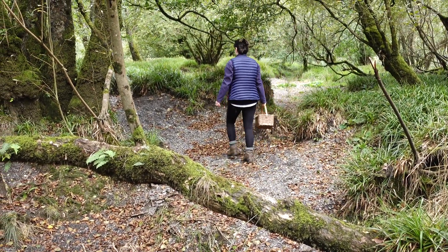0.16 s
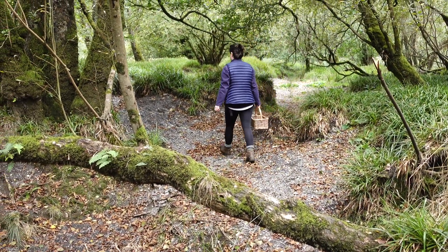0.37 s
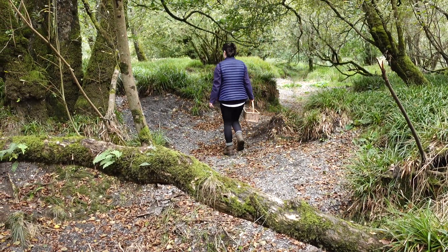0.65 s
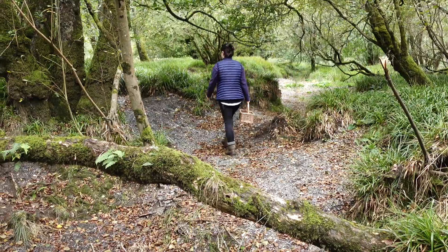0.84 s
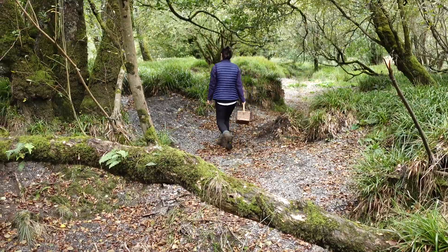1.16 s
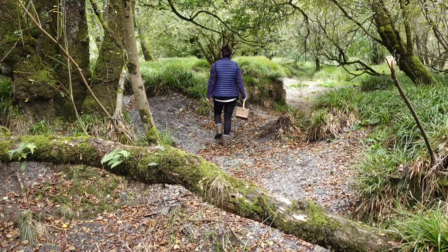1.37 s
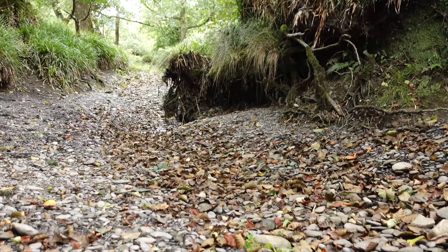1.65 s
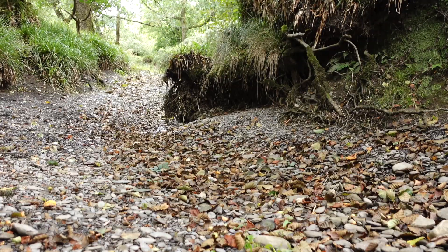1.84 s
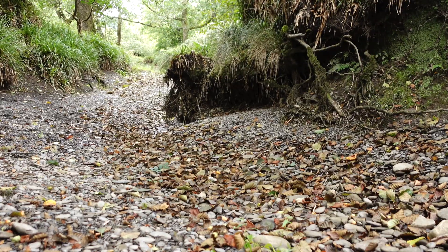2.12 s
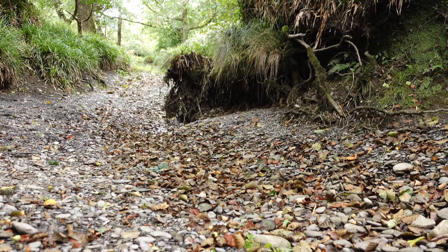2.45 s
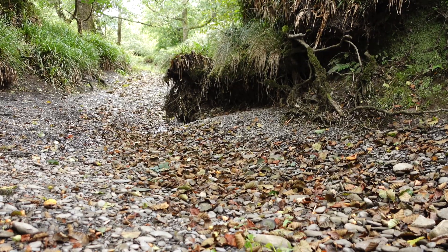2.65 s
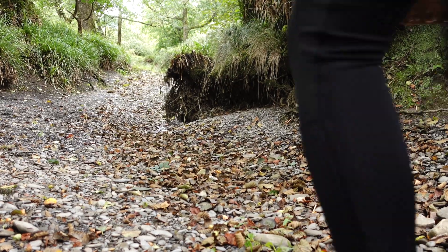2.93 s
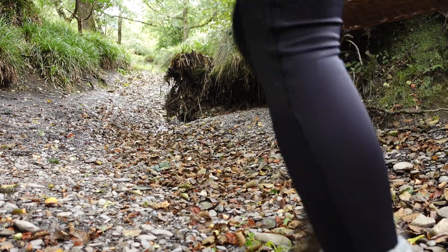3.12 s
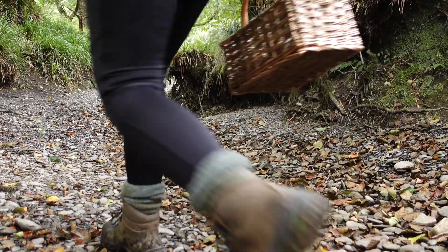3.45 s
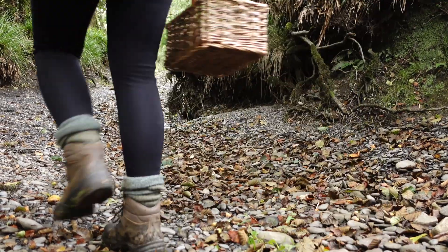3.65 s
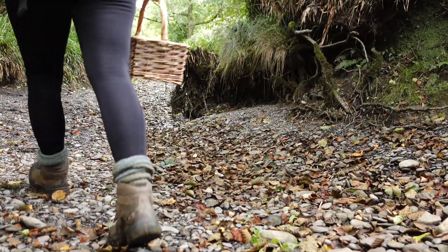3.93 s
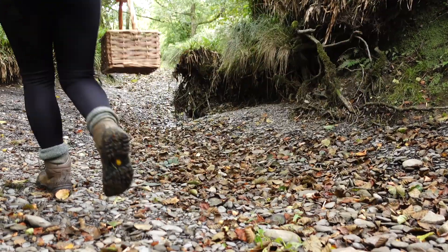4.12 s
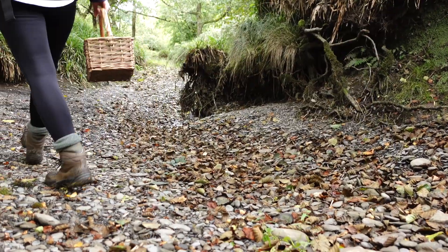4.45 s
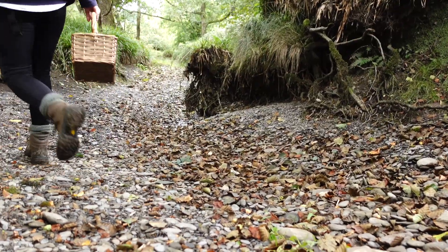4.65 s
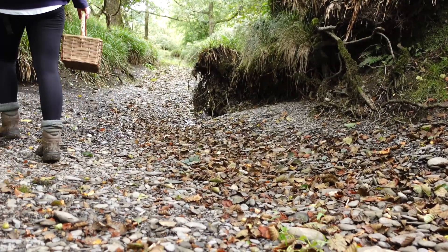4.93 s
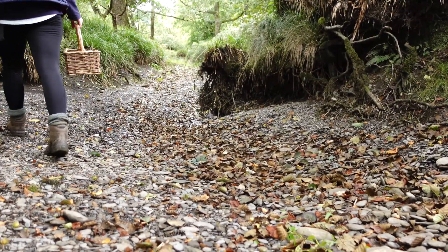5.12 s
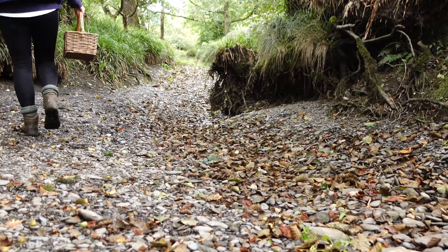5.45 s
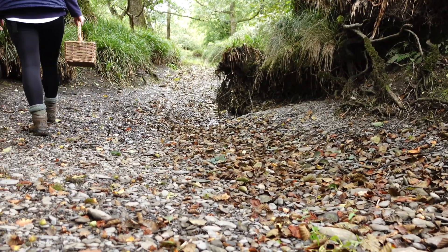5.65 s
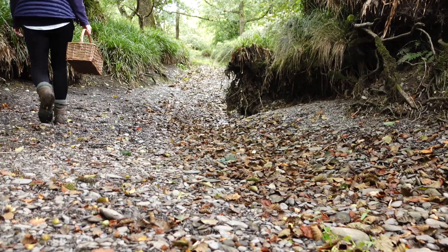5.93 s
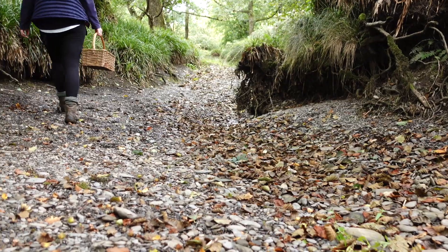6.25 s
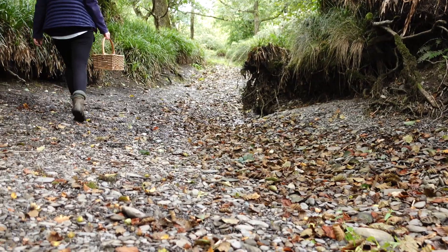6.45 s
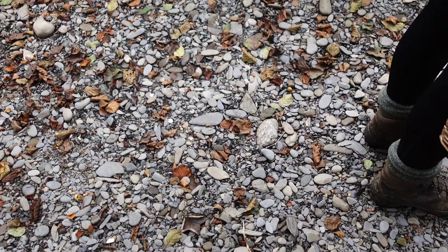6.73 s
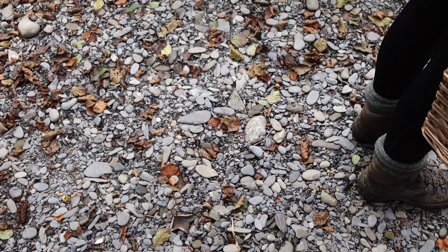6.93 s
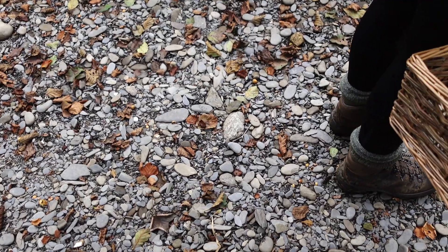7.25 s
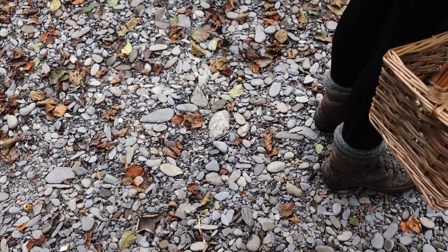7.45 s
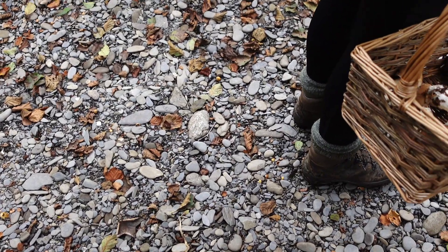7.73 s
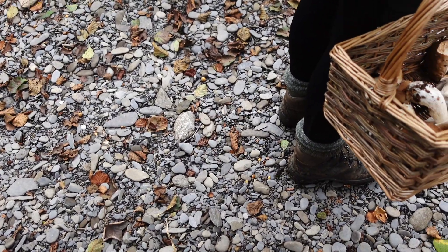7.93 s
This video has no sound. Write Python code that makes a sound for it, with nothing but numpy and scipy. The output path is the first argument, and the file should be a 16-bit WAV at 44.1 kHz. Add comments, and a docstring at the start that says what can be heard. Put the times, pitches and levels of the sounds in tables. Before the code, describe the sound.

Boots crunch over loose pebbles and dry leaves, faint, then suddenly loud and close, then receding; quiet woodland water wash and soft basket knocks finish.

```python
"""A pebbly, leaf-strewn stream bed in a wood: a walker in boots crosses it, far off, then close by, then away.
Each footfall stirs beds of random grain contacts and knocks single stones, made as sharp blows with noisy rattles.
Running water is noise in fluttering half-octave bands, and a far engine is one wavering sine.
At the end the place is quieter and a carried basket, a set of damped modes, knocks softly."""
import sys
import numpy as np
from scipy import signal
from scipy.fft import rfft, irfft
from scipy.io import wavfile

SR = 44100
rng = np.random.default_rng(int(sys.argv[2]) if len(sys.argv) > 2 else 0)


def store_wav(level_fs):
    """Save 16-bit WAV to argv[1]."""
    pcm = np.round(np.clip(np.atleast_2d(level_fs), -1, 1) * 32767)
    wavfile.write(sys.argv[1], SR, pcm.T.astype(np.int16))


N = 356328
TIME = np.arange(N) / SR
PATH_END_S = 1.6  # the scene changes from the path to the stream bed
WALK_END_S = 6.735  # the scene changes to a quiet spot, where the walker is no longer heard

# One row a step: the heel lands, the sole follows, then the other boot pushes off.
# Firm ground gives way briefly, loose ground slowly. Drives of the grain beds before their mixing gains:
# start_s, sole_lag_s, push_lag_s, give_t60_s, heel_db, sole_db, push_db, thud_db (packed ground),
# stones_db (large stones re pebbles), grit_db (grit re pebbles)
FOOTSTEPS = [(0.39, 0.058, 0.15, 0.53, -64, -60, -68, -69, -4, -8.5),
             (0.985, 0.022, 0.18, 0.67, -70, -60, -69, -76, -10, -3),
             (1.698, 0.11, 0.21, 0.34, -47.5, -36.5, -58.5, -47.5, -3, -3),
             (2.235, 0.044, 0.11, 0.26, -29, -27, -37.5, -42.5, -13.5, -13),
             (2.822, 0.056, 0.069, 0.14, -23.5, -28.5, -39.5, -41, -3, -5.5),
             (3.309, 0.05, 0.23, 0.37, -51, -35, -45, -44.5, 3.5, -4.5),
             (3.945, 0.08, 0.17, 0.38, -39.5, -47, -50.5, -52, 1.5, -0.5),
             (4.51, 0.024, 0.16, 0.39, -48, -47, -52.5, -52, 2, 2.5),
             (5.094, 0.12, 0.25, 0.44, -55.5, -57.5, -66, -60.5, 6, 3),
             (5.77, 0.07, 0.21, 0.47, -57.5, -56.5, -61, -62.5, 1.5, -6),
             (6.39, 0.083, 0.17, .6, -62, -57.5, -60, -69.5, -2.5, -5.5)]


def from_db(db):
    """Level law: 20 dB is a factor of ten in amplitude."""
    return 10 ** (np.asarray(db) / 20)


def rms_one(x):
    """Normalisation to unit mean power."""
    return x / np.sqrt(np.mean(x ** 2) + 1e-20)


def in_time(rows):
    """Linear interpolation of (s, value) rows over the whole scene."""
    return np.interp(TIME, *np.transpose(rows))


def at_hz(points, hz):
    """Interpolation of (Hz, value) points along a logarithmic frequency axis."""
    points = np.array(points)
    return np.interp(np.log(hz), np.log(points[:, 0]), points[:, 1])


def add(out, s, sound):
    """Superposition: mix a short sound in at a time."""
    start = int(s * SR)
    out[start:start + len(sound)] += sound


def spot(start_s, end_s, fade_s=0.0098):
    """Gate: 1 while the listener is at a spot, with a short linear fade at each end."""
    return np.clip(np.minimum(TIME - start_s, end_s - TIME) / fade_s + .5, 0, 1)


def drift(rate):
    """Slow random modulation of spread 1, with a new value `rate` times a second."""
    return rms_one(np.interp(TIME * rate, np.arange(4096), rng.standard_normal(4096)))


def band(x, low_hz, high_hz, order=2):
    """Causal band-pass filtering."""
    edges = [low_hz, min(high_hz, .47 * SR)]
    return signal.sosfilt(signal.butter(order, edges, "band", fs=SR, output="sos"), x + 1e-18)


def ring(x, hz, t60):
    """Damped resonance: a unit click sets a sine of initial height about 1 ringing."""
    decay = from_db(-60 / (t60 * SR))
    angle = 2 * np.pi * hz / SR
    return signal.lfilter([0, np.sin(angle)], [1, -2 * decay * np.cos(angle), decay * decay], x + 1e-18)


def place(x, pan):
    """Level difference between channels: sound from one side is louder there, by an amount set by frequency."""
    # share of the left-right level difference kept at each pitch: pitch_hz, share (0-1)
    side_share = [(150, .1), (700, 0.5), (2800, 0.87), (5500, 0.9), (10000, 0.8), (13000, .25)]
    hz = np.maximum(np.arange(N + 1) * SR / (2 * N), 1)
    sided = irfft(rfft(x, 2 * N) * at_hz(side_share, hz))[..., :N]
    return x + pan * sided * np.array([[-1], [1]])


def scatter(x, t60, top_hz):
    """Diffuse reverberation: a decaying noise tail of many small reflections, different at each ear."""
    age = TIME[:SR]
    tail = band(rng.standard_normal((2, SR)), 300, top_hz, order=1)
    tail = tail * from_db(-60 * age / t60) * np.minimum(age / .001, 1)
    return signal.fftconvolve(x[None], tail / np.sqrt(np.sum(tail[0] ** 2)), axes=1)[:, :N]


def on_the_bed(x, pan):
    """Reflection: stones round the boot throw clicks back in a short tail, banks and trunks in a long dull one."""
    near = x + from_db(-12.5) * scatter(x, t60=0.0349, top_hz=14200)[0]
    return place(near, pan) + from_db(-31.5) * scatter(near, t60=0.3, top_hz=7000)


def water(spectrum, likeness, babble_db):
    """Turbulent noise: a stereo wash whose half-octave bands flutter each on their own. Rms 1."""
    out = 0
    edges = 35 * 2 ** np.arange(0, 9.6, .5)
    white = rng.standard_normal((2, 2, N))
    for k, (low, high) in enumerate(zip(edges, edges[1:])):
        mid, side = band(white[k % 2], low, high)
        hz = np.sqrt(low * high)
        alike = np.clip(at_hz(likeness, hz), 0, 1)
        gain = from_db(at_hz(spectrum, hz) + babble_db * drift(35))
        # these weights of sum and difference give the channels the correlation `alike`
        out = out + gain * (np.sqrt(1 + alike) * mid + np.sqrt(1 - alike) * side * [[1], [-1]])
    return rms_one(out)


def hum(pitch_hz=114.8, waver_hz=2.7, flutter_db=1.5):
    """Frequency and amplitude modulation: a far engine drones and wavers; it does not reach the quiet spot."""
    # level of the hum before flutter: start_s, level_db
    hum_levels = [(0, -104), (.9, -70), (2.1, -79), (3.35, -61), (3.9, -71), (4.4, -70.5), (6.05, -74.5),
                  (6.5, -70.5), (6.73, -58)]
    phase = 2 * np.pi * np.cumsum(pitch_hz + waver_hz * drift(17.0)) / SR
    level = from_db(in_time(hum_levels) + flutter_db * drift(15))
    return level * np.sqrt(2) * np.sin(phase) * spot(0, WALK_END_S)


def chirps(width_hz=400):
    """Narrow-band noise: faint thin whistles swell and fade."""
    # thin high chirps: start_s, length_s, pitch_hz, level_db (before the swell)
    chirp_rows = [(1.578, 0.24, 11900, -58), (2.106, 0.056, 12700, -50)]
    out = np.zeros(N)
    for s, length, hz, db in chirp_rows:
        swell = np.sin(np.pi * np.clip((TIME - s) / length, 0, 1))
        whistle = band(rng.standard_normal(N), hz - width_hz / 2, hz + width_hz / 2)
        out += from_db(db) * swell * rms_one(whistle)
    return out


def basket():
    """Modal synthesis: modes of alternating sign first cancel in part, so each soft knock swells as they part."""
    # soft knocks: start_s, drive_db (before the mode gains)
    knocks = [(7.415, -54), (7.571, -53), (7.607, -51), (7.688, -49), (7.717, -49), (7.803, -48),
              (7.906, -50.5), (8.013, -49)]
    # modes of the hollow body: pitch_hz, gain_db, t60_s
    modes = [(401, 6, 0.08), (449, 8, 0.017), (910, -13, 0.044)]
    clicks = np.zeros(N)
    for s, drive_db in knocks:
        clicks[int(s * SR)] = from_db(drive_db)
    return sum((-1) ** k * from_db(db) * ring(clicks, hz, t60) for k, (hz, db, t60) in enumerate(modes))


def squeak(jitter_hz=150):
    """Stick-slip friction: something rubs, sticks and slips ever more slowly, so the pitch falls."""
    # one short squeak: start_s, length_s, first_hz, last_hz, level_db (before the envelope)
    squeak_row = (4.744, .034, 1680, 1080, -44)
    s, length, first_hz, last_hz, level_db = squeak_row
    done = np.clip((TIME - s) / length, 0, 1)
    hz = first_hz + (last_hz - first_hz) * done + jitter_hz * drift(400)
    envelope = np.minimum(10 * done, 1) * (1 - done)
    return from_db(level_db) * envelope * np.sin(2 * np.pi * np.cumsum(hz) / SR)


def leaves(grit, per_s=45, spread_db=8.5, settle_s=.1, most_db=-44):
    """Random impulses: dry leaves snap one by one as the grit settles after each footfall."""
    keep = np.exp(-1 / (settle_s * SR))
    stirred = signal.lfilter([1 - keep], [1, -keep], np.minimum(grit, from_db(most_db)) + 1e-18)
    sizes = from_db(spread_db * np.minimum(rng.exponential(1, N), 3))
    snaps = (rng.random(N) < per_s / SR) * sizes * rng.choice([-1, 1], N)
    return from_db(6) * stirred * band(snaps, 4500, 15000, order=1)


def clack(hz):
    """Impact: one sharp blow, then chatter against the neighbours; small stones sound higher and shorter."""
    age = TIME[:4096]
    click = signal.unit_impulse(len(age))
    rattle_t60 = 0.0076 * (4000 / hz) ** .55  # s; 7.6 ms for a middling stone of 4 kHz
    # a heavy stone stays in contact longer, which dulls its blow
    contact = signal.sosfilt(signal.butter(2, min(hz * 1.93, .45 * SR), fs=SR, output="sos"), click)
    impact = band(contact, hz * 0.67, hz * 1.4, order=1)
    chatter = rms_one(band(rng.standard_normal(len(age)), hz * 0.56, hz * 1.51))
    dying = from_db(-60 * age / rattle_t60) * np.minimum(age / .0003, 1)
    # the ground thumps too, less and less for stones pitched above 2040 Hz
    thump = from_db(-22) * min(2040 / hz, 1) ** 2 * ring(click, hz=262, t60=0.034)
    return from_db(-2.0) * impact / np.abs(impact).max() + from_db(-6.5) * chatter * dying + thump


def clacks(rebound_s=.004, rebound_db=-11.5):
    """Impact and rebound: each loud stone hops and lands once more; also gives the side on which it lies."""
    # the loudest single stones: start_s, level_db (before the blow and rattle gains), pitch_hz,
    # pan (-1 left to 1 right)
    loud_stones = [(1.8057, -21, 8300, .6), (1.9633, -20.5, 4770, .6), (2.255, -11.5, 5250, 0.66),
                   (2.2977, -3.5, 4700, .5), (2.299, -20, 480, 0.45), (2.3075, -9.5, 4100, 0.44),
                   (2.3843, -16, 3870, 0.37), (2.4133, -6.5, 3950, 0.46), (2.5246, -16.5, 3630, 0.37),
                   (2.6709, -29, 2710, .4), (2.849, -3, 8560, .3), (2.889, -15, 710, 0.16),
                   (2.938, -10.5, 7450, 0.43), (2.9546, -5.5, 4000, .3), (2.9703, -11.5, 6600, .3),
                   (2.975, -10, 2000, .3), (2.9951, -7, 3430, .35), (3.0007, -6, 5420, .35),
                   (3.0086, -13, 3910, .35), (3.069, -10.5, 5300, .35), (3.0965, -27, 4700, .3),
                   (3.1223, -21, 3800, 0.39), (3.1387, -14.5, 3980, 0.23), (3.1548, -12.5, 7100, 0.17),
                   (3.316, -27, 1430, -0.031), (3.377, -10, 4260, 0), (3.48, -18.5, 4600, 0),
                   (3.534, -20.5, 4200, 0), (3.5858, -25.5, 1850, 0.036), (3.637, -34, 1370, 0),
                   (3.9867, -22, 520, 0), (4.1101, -7, 6560, -.3), (4.172, -25, 6700, 0),
                   (4.1853, -20, 6400, 0), (4.5821, -12, 8000, 0), (5.347, -29.5, 9900, 0)]
    out, side = np.zeros(N), np.zeros(N)
    hops = rng.uniform(0.55, 1.5, len(loud_stones))
    for (s, level_db, hz, pan), hop in zip(loud_stones, hops):
        add(out, s, from_db(level_db) * clack(hz))
        add(out, s + hop * rebound_s, from_db(level_db + rebound_db) * clack(hz))
        side[int(s * SR):] = pan
    return out, side


def loose_pebbles(stirred, low_hz=1800, high_hz=8000, most_db=-46, count=8):
    """Random impacts: stray pebbles of all sizes tick, the louder the more the bed is stirred, up to a limit."""
    per_s, base_db, spread_db = 53, 13, 2.5
    sizes = from_db(base_db + spread_db * np.minimum(rng.exponential(1, N), 3))
    ticks = (rng.random(N) < per_s / SR) * sizes * np.minimum(stirred, from_db(most_db))
    dealt = rng.integers(0, count, N)
    pitches = np.geomspace(low_hz, high_hz, count)
    return sum(signal.oaconvolve(ticks * (dealt == k), clack(hz))[:N] for k, hz in enumerate(pitches))


def heel_touches(lag_s=0.0087, touch_db=21, pitch_hz=7500):
    """Impact: each step opens with a click as the edge of the heel meets the top stones."""
    out = np.zeros(N)
    for s, _, _, _, heel_db, *_, grit_db in FOOTSTEPS:
        # touch_db is relative to the heel's grit
        add(out, s + lag_s, from_db(heel_db + grit_db + touch_db) * clack(pitch_hz))
    return out


def press(s, db, rise_s, t60):
    """Loading and relaxation: power of one press on the ground, which builds up, then dies away."""
    age = TIME[:2 * SR]
    load = np.minimum(age / rise_s, 1) * from_db(db - 60 * np.maximum(age - rise_s, 0) / t60)
    return np.concatenate([np.zeros(max(int(s * SR), 0)), load ** 2, np.zeros(N)])[:N]


def gait():
    """Addition of powers: how hard the steps stir the packed ground, large stones, pebbles and grit."""
    rise_share = 0.09  # time the ground takes to load, as a share of its give
    stone_linger = 1.13  # large stones roll this many times longer than pebbles
    push_stones_db = -11.5  # a push-off skims the surface and moves few large stones
    heel_thud_db = -1.5  # the heel thuds less than the sole
    thud, stones, pebbles, grit = np.zeros((4, N))
    for s, sole_lag, push_lag, give, heel_db, sole_db, push_db, thud_db, stones_db, grit_db in FOOTSTEPS:
        sole_s, rise = s + sole_lag, rise_share * give
        blows = [(s, heel_db), (sole_s, sole_db)]
        landing = sum(press(at, db, rise, give) for at, db in blows)
        rolling = sum(press(at, db, rise, stone_linger * give) for at, db in blows)
        # the bed settles under the sole
        settling = press(sole_s, sole_db - 18, rise_s=.04, t60=1)
        push = press(s + push_lag, push_db, rise_s=0.052, t60=0.73)
        thud += press(s, thud_db + heel_thud_db, rise, give) + press(sole_s, thud_db, rise, give)
        stones += from_db(stones_db) ** 2 * rolling + from_db(push_stones_db) ** 2 * push
        pebbles += landing + settling + push
        grit += from_db(grit_db) ** 2 * (landing + settling + push)
    return np.sqrt([thud, stones, pebbles, grit]) * spot(0, WALK_END_S)


def grains(spectrum, count, octaves, per_s, spread_db, slips_per_s, slide_s):
    """Granular noise: tiny contacts ring in `count` bands and crowd together in the slide after each slip. Rms 1."""
    centres = np.geomspace(spectrum[0][0], spectrum[-1][0], count)
    slips = (rng.random(N) < slips_per_s / SR) * rng.exponential(1, N)
    sliding = signal.lfilter([1], [1, -np.exp(-1 / (slide_s * SR))], slips)
    # a steady share of 0.3 comes on top of the contacts that follow the slides
    born = rng.random(N) < per_s * (.3 + sliding / sliding.mean()) / SR
    sizes = from_db(spread_db * np.minimum(rng.exponential(1, N), 4))
    clicks = born * sizes * rng.choice([-1, 1], N)
    dealt = rng.integers(0, count, N)
    edge = 2 ** (octaves / 2)
    return rms_one(sum(from_db(at_hz(spectrum, hz)) * band(clicks * (dealt == k), hz / edge, hz * edge)
                       for k, hz in enumerate(centres)))


def gravel(thud, stones, pebbles, grit):
    """Granular flow: the ground thuds, large stones knock, pebbles crunch, grit and leaves crackle."""
    # colour of the packed ground and of the three sizes of grain: pitch_hz, level_db (per Hz)
    ground_colour = [(60, -23.5), (110, -2.5), (160, 0.5), (230, 5.5), (330, 0)]
    stone_colour = [(350, 2.5), (470, 1.5), (630, 4.5), (790, 0.5), (1000, -2), (1350, 1), (1900, -16)]
    pebble_colour = [(1400, -7.5), (2000, -2), (2700, 1.5), (4000, -2), (6000, -0.5), (8500, -17.5)]
    grit_colour = [(5000, -1), (8000, -7), (11000, -2.5), (15000, -18.5)]
    # light hiss of trickling grit while the walker is near, before the grit gain: start_s, level_db
    trickle_levels = [(1.55, -85), (1.65, -60.5), (2.6, -67.5), (3.2, -56.5), (4.5, -68), (6.7, -89.5)]
    grit = np.hypot(grit, from_db(in_time(trickle_levels)) * spot(0, WALK_END_S))
    ground_noise = grains(ground_colour, count=8, octaves=0.46, per_s=2500,
                          spread_db=3.0, slips_per_s=200, slide_s=.006)
    stone_noise = grains(stone_colour, count=22, octaves=0.26, per_s=2400,
                         spread_db=1.5, slips_per_s=180, slide_s=0.0054)
    pebble_noise = grains(pebble_colour, count=14, octaves=0.88, per_s=7000,
                          spread_db=0, slips_per_s=300, slide_s=.0014)
    grit_noise = grains(grit_colour, count=6, octaves=0.76, per_s=20000,
                        spread_db=2.0, slips_per_s=610, slide_s=0.0011)
    return (from_db(-0.5) * thud * ground_noise + from_db(-0.8) * stones * stone_noise
            + from_db(-0.9) * pebbles * pebble_noise + from_db(1.93) * grit * grit_noise)


def scene():
    """Superposition: the walker over the surroundings of three spots in turn."""
    # where the walker is: start_s, pan (-1 left to 1 right)
    walker_pan = [(0, 0), (1.7, 0.56), (2.35, 0.51), (2.85, 0.31), (3.05, 0.18), (3.35, 0), (6.7, 0)]
    # colour of the water from the path, the stream bed and the quiet spot: pitch_hz, level_db (per Hz)
    path_colour = [(21, -43), (35, -12.5), (126, 0), (180, -3), (334, -0.5), (443, -1), (1110, 1.5),
                   (2660, -3.5), (3440, -7.5), (5740, -11.5), (7230, -21), (14800, -24), (16000, -46)]
    bed_colour = [(21, -51), (35, -23), (114, -9), (272, -13.5), (478, -18), (572, -18.5), (739, -12.5),
                  (1030, -10), (1720, -16.5), (2590, -16.5), (6200, -23), (13700, -36.5), (16000, -36)]
    quiet_colour = [(21, -45), (35, -17), (82, -14), (103, -4.5), (159, -8.5), (272, -2.5), (1110, -6.5),
                    (1200, -7.5), (1960, -8.5), (2220, -6.5), (3270, -15.5), (4920, -18.5), (16000, -26)]
    # level of the water at the same three spots: start_s, level_db
    path_levels = [(0, -55.5), (.8, -56.5), (1.6, -55.5)]
    bed_levels = [(1.6, -56), (4.4, -55.5), (5.05, -58.5), (6.3, -58.5), (6.73, -57.5)]
    quiet_levels = [(6.73, -65.5), (7.25, -66.5), (7.7, -64.5)]
    # correlation of the two channels along the stream and in the quiet spot: pitch_hz, likeness (0-1)
    stream_likeness = [(60, 1), (200, 0.7), (1400, 0.79), (3100, 0.96), (8000, 1)]
    quiet_likeness = [(60, 0.67), (700, 0.54), (9000, 0.75), (13000, 1)]

    path = from_db(in_time(path_levels)) * water(path_colour, stream_likeness, babble_db=1.96)
    bed = from_db(in_time(bed_levels)) * water(bed_colour, stream_likeness, babble_db=1.37)
    quiet = from_db(in_time(quiet_levels)) * water(quiet_colour, quiet_likeness, babble_db=1.0)
    around = (spot(-1, PATH_END_S) * place(path, 0.15) + spot(PATH_END_S, WALK_END_S) * bed
              + spot(WALK_END_S, np.inf) * quiet)
    thud, stones, pebbles, grit = gait()
    steps = gravel(thud, stones, pebbles, grit) + heel_touches() + loose_pebbles(pebbles) + leaves(grit) + squeak()
    walker = on_the_bed(steps, in_time(walker_pan)) + on_the_bed(*clacks())
    # the basket is louder on the right
    return walker + around + hum() + chirps() + basket() * from_db([[-3], [1.8]])


def record(dry):
    """Band limiting: the deep bass and the very top are cut."""
    lean = signal.sosfilt(signal.butter(2, 42, "high", fs=SR, output="sos"), dry)
    return signal.sosfilt(signal.ellip(10, .1, 80, 16000, fs=SR, output="sos"), lean)


dry = scene()
out = record(dry)
store_wav(out)
```